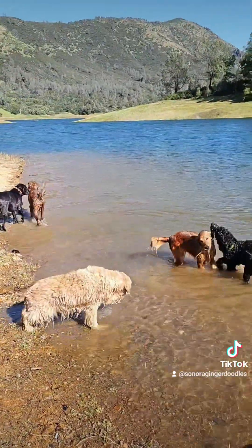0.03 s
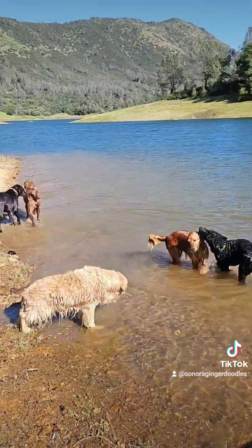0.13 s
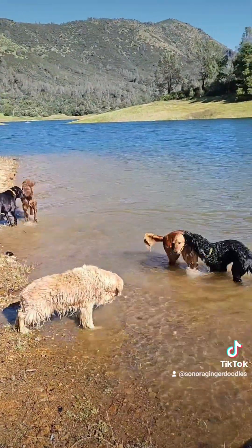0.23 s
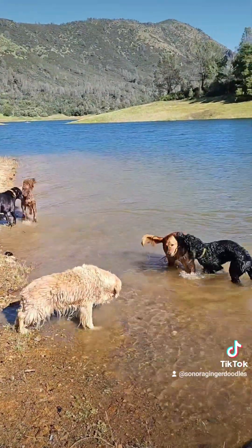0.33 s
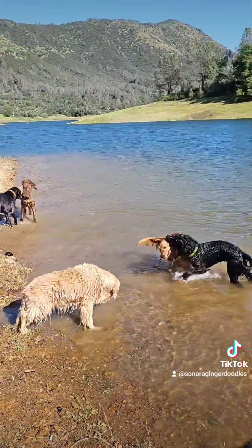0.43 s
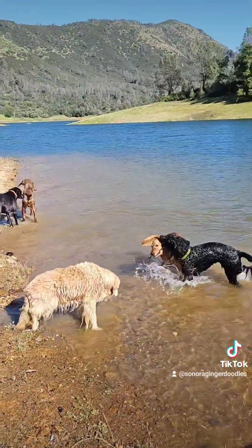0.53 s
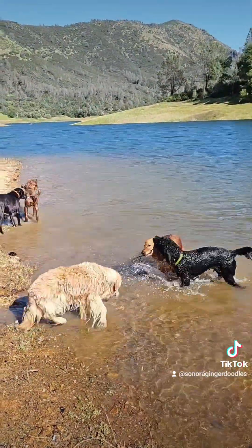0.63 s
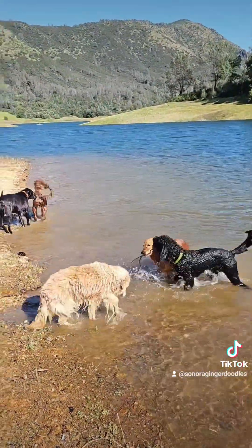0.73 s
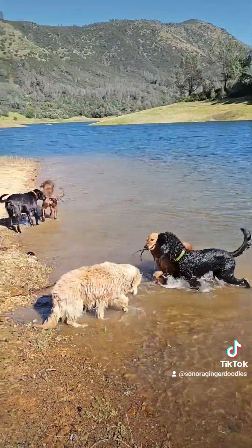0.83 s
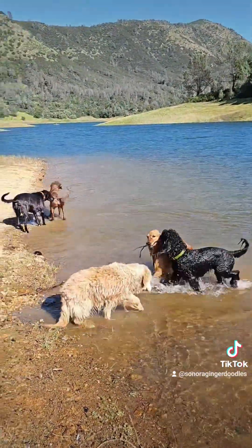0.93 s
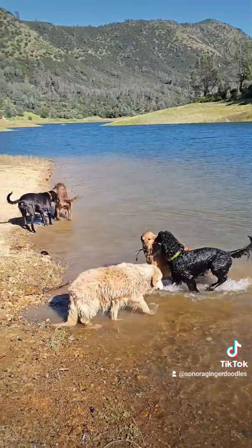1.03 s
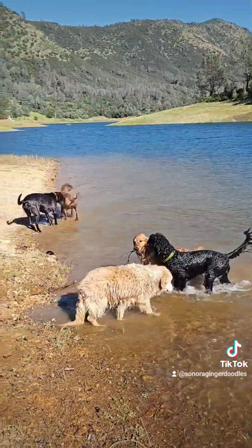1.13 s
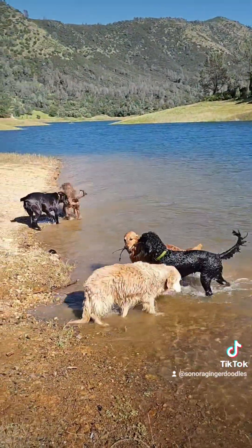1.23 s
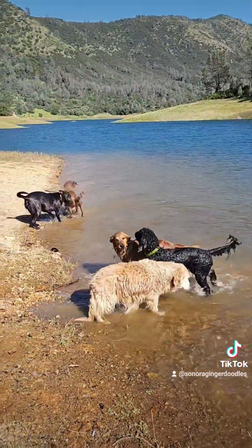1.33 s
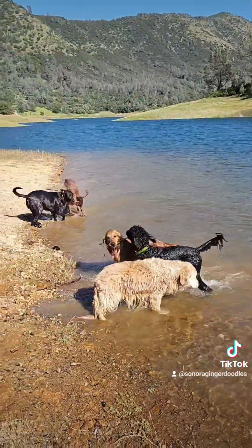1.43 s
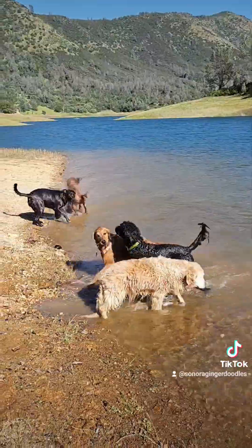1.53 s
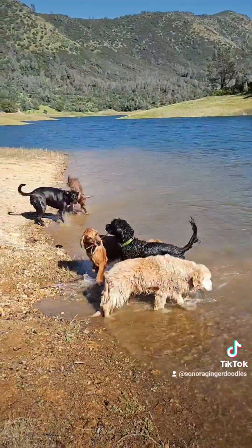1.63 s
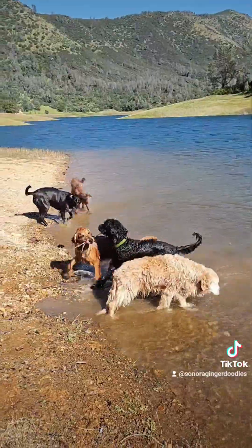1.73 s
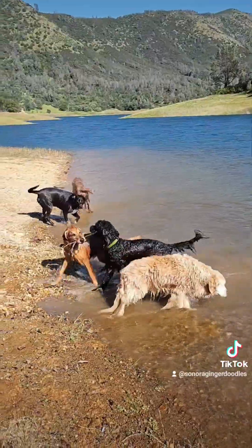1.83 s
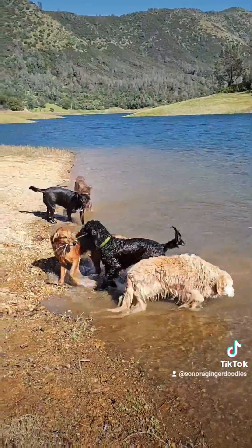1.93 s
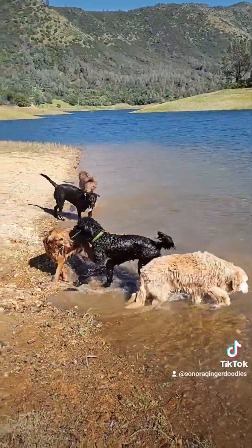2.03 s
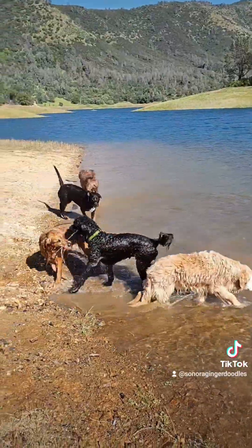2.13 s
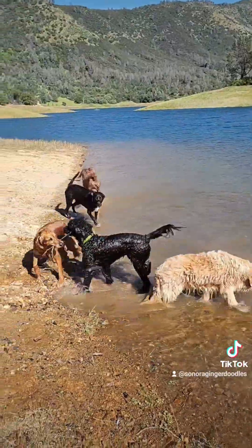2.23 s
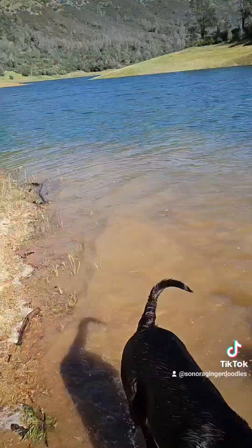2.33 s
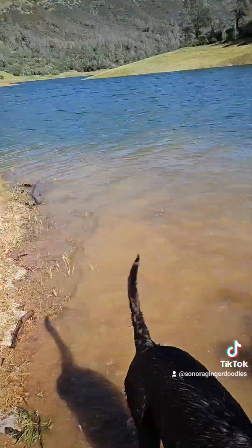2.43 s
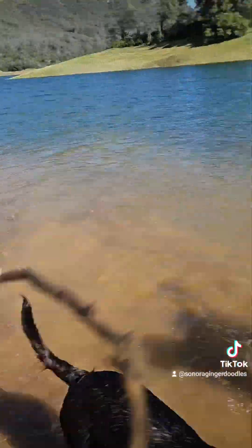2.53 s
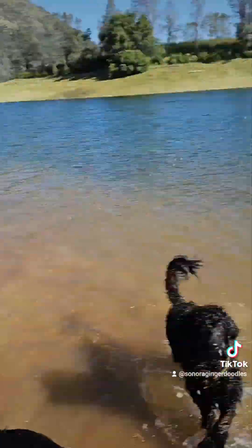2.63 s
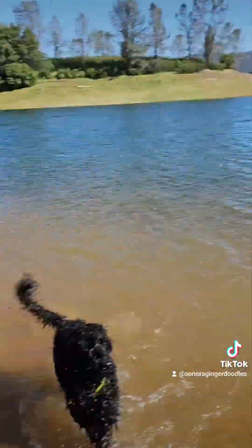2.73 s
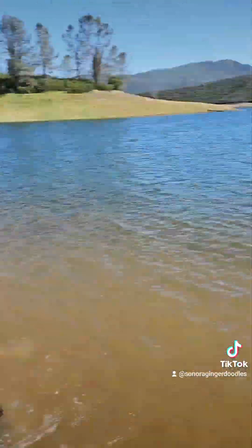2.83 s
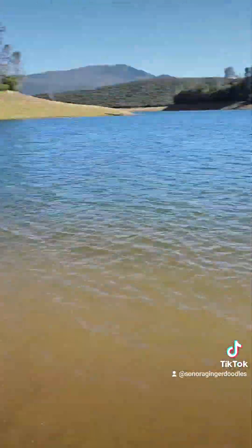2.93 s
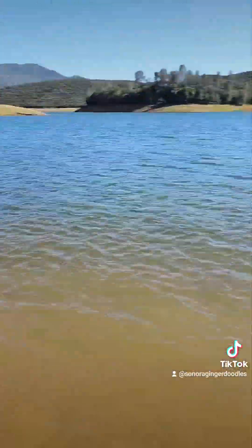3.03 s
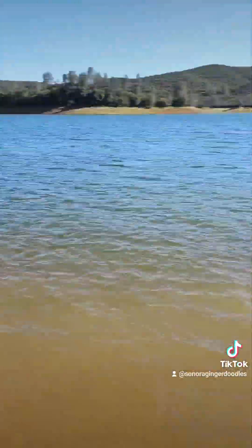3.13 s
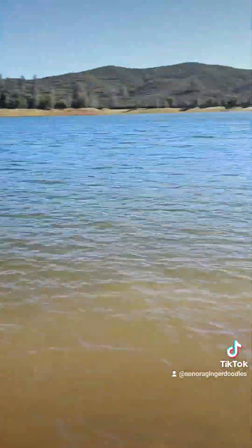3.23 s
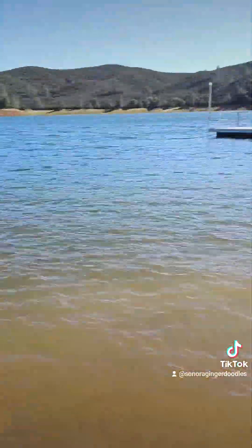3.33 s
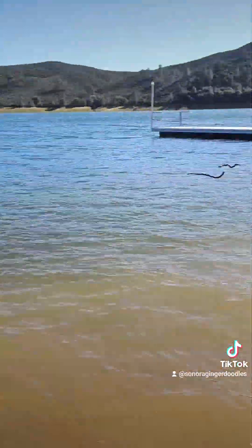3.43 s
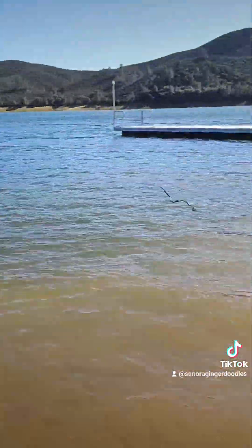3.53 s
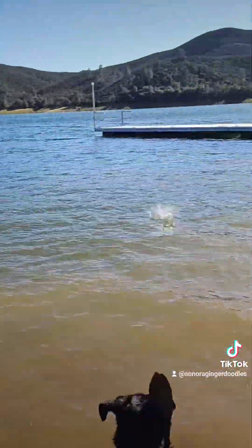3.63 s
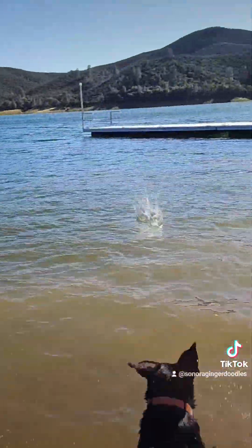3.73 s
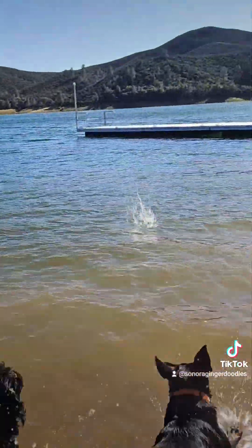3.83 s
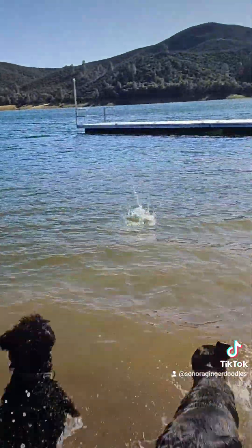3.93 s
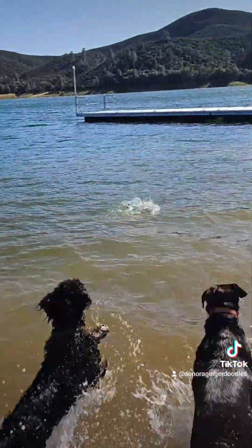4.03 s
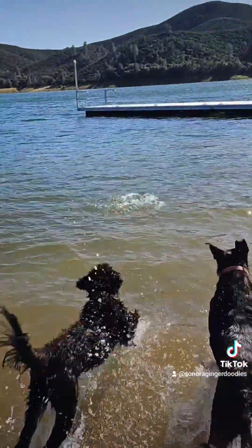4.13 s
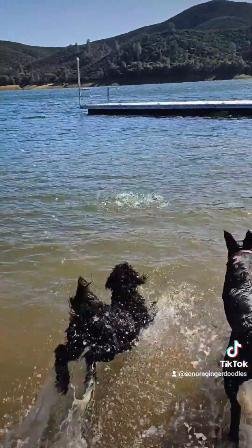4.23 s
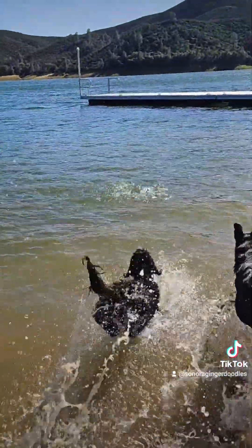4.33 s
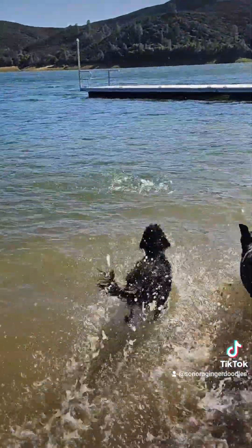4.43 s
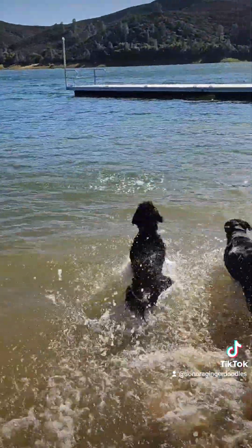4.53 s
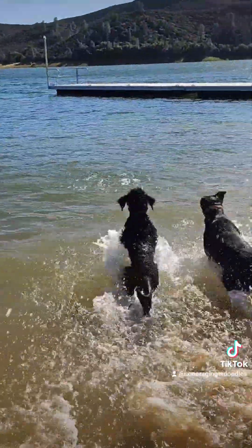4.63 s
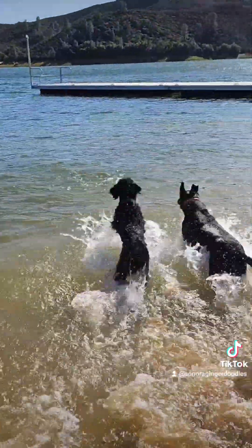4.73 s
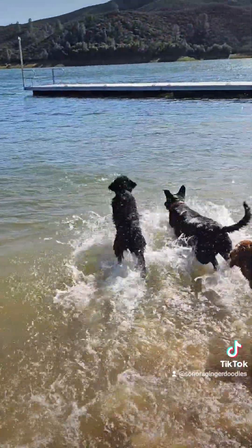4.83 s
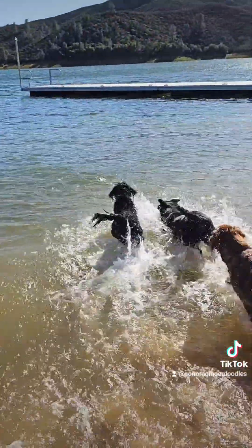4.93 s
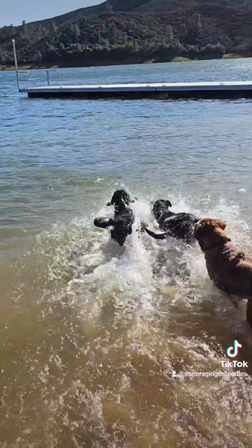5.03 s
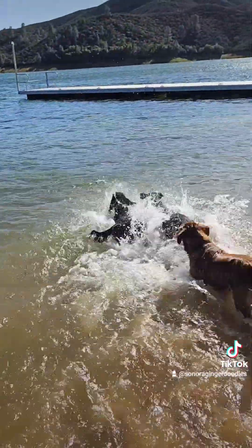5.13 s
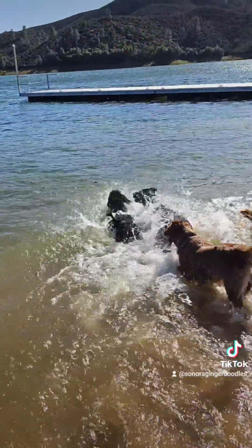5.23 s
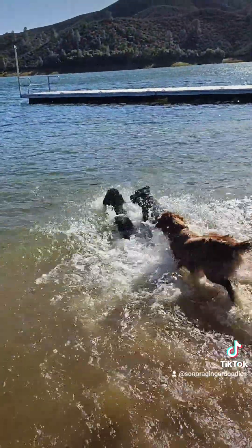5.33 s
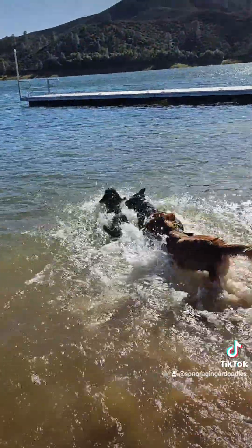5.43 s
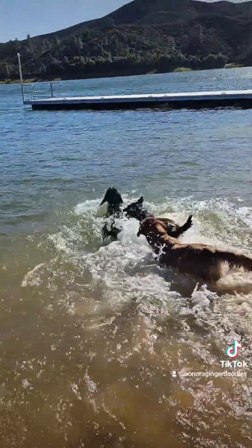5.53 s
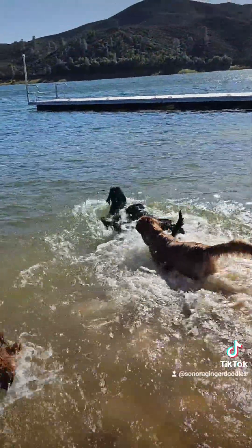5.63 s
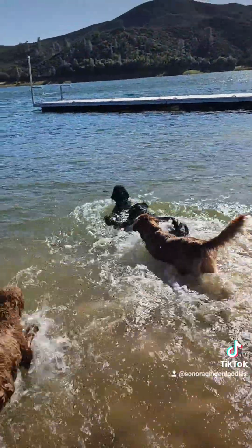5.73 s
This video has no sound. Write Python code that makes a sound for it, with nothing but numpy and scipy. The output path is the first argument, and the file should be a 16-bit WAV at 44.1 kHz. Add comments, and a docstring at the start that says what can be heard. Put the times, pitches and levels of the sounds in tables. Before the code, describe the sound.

Dogs wade quietly through lake shallows in buffeting wind, then after a brief silence several charge into the water close by with heavy splashing.

```python
"""Lake shallows, microphone in the wind: dogs wade at a distance in one direction; after a short silent
break several charge into the water close by, on all sides.
The water is a swarm of ringing bubbles and falling drops, with paw slaps and the gulps of collapsing hollows.
Wind is lumpy low noise, unrelated at the microphone's two ports, with single eddies as short pressure pulses."""
import sys
import numpy as np
from scipy import signal
from scipy.fft import rfft, irfft, next_fast_len
from scipy.io import wavfile
from scipy.ndimage import uniform_filter1d, map_coordinates

SR = 44100
rng = np.random.default_rng(int(sys.argv[2]) if len(sys.argv) > 2 else 0)


def waveform_to_disk(signal):
    """Save audio, clipped to [-1, 1], as 16-bit WAV at the path in sys.argv[1]."""
    frames = np.transpose(np.atleast_2d(signal))
    scaled = np.clip(frames, -1, 1) * 32767
    samples = np.round(scaled).astype(np.int16)
    wavfile.write(sys.argv[1], SR, samples)


N = 254456
TIME = np.arange(N) / SR

# Levels in the tables are before the trims given in the calls; positive left_right_db leans left.

# water kept churning by all the legs; deep water gurgles, shallow water sprays: start_s, level_db, depth_db
CHURN = [(0.0, -63.5, -1.3), (0.188, -61, 2.2), (0.434, -56.5, 1), (1.106, -59, 0.6), (1.635, -58.5, -2),
         (2.098, -59, 2), (2.34, -60.5, -2), (2.74, -71.5, -9), (2.834, -59, 0.5), (3.144, -57, -3),
         (3.393, -49, -3.5), (3.774, -45.5, -2.8), (4.525, -46, -1.5), (4.818, -49, 0), (5.294, -47, -0.4),
         (5.77, -46.5, -0.7)]
# a leg or chest ploughs through the water: start_s, push_s, level_db, depth_db
STRIDES = [(0.121, 0.025, -59.5, 6.1), (0.302, 0.015, -76, 19), (0.444, 0.17, -65.5, -11.5),
           (0.78, 0.096, -58.5, 4), (0.899, 0.065, -65, -7), (0.988, 0.074, -57, 0.5),
           (1.172, 0.057, -60, 0.5), (1.279, 0.028, -55.5, 1), (1.357, 0.056, -60.5, -1.5),
           (1.7, 0.037, -58.5, 2.5), (1.764, 0.078, -58.5, 1), (1.94, 0.113, -73.5, -18.5),
           (2.088, 0.084, -59.5, 0), (2.183, 0.05, -55, 2.3), (2.895, 0.023, -56.5, 8),
           (3.056, 0.027, -53.5, -5.5), (3.243, 0.051, -59.5, 5), (3.449, 0.026, -60, -5),
           (3.57, 0.079, -48.5, 0.5), (3.697, 0.031, -48.5, -0.5), (3.855, 0.038, -46.5, -3.5),
           (3.986, 0.018, -49, 5.5), (4.078, 0.028, -47, 7.5), (4.207, 0.038, -50.5, 7),
           (4.303, 0.023, -48.5, -1), (4.482, 0.091, -44, -0.7), (4.583, 0.2, -45, 1.5),
           (4.83, 0.015, -57.5, -15), (4.961, 0.1, -43.5, -1.3), (5.112, 0.08, -46, 0.7),
           (5.404, 0.075, -47, -2.5), (5.614, 0.07, -47.5, 4.5)]
# colour of the distant water: pitch_hz, relative level_db
FAR_WATER = [(150, -7), (400, 10), (600, 6), (800, 8), (980, 7.5), (1220, -6.5), (1600, -2), (1950, -3.5),
             (2400, -14), (4500, -19.5), (5800, -26), (9000, -26), (12500, -31.5), (15700, -27)]
# sound bends round the microphone body, from afar: pitch_hz, left_lead_radians
FAR_PHASE = [(600, 0), (950, -.65), (1250, -1.2), (1550, 0), (2100, 1.5), (3000, 4.6), (3900, 5.2),
             (4700, 6.3), (5700, 9.4), (7500, 12), (10000, 12.6), (15000, 14)]
# the wind between gusts: start_s, level_db, flutter_db (over the rumble), left_right_db
BREEZE = [(0.0, -45, -2.5, -5.5), (0.65, -47.5, 0.5, 10.5), (0.92, -69, 3.5, 13), (1.154, -72, 10, 10),
          (1.208, -53.5, 0, 19), (1.576, -50, -8, 3), (1.763, -67.5, 5.5, 7), (2.34, -66, 5, -12.5),
          (2.74, -53.5, 4.5, 17.5), (2.972, -49.5, -7, -32), (3.523, -51, -1.5, -24), (3.754, -44, 4.5, -1),
          (4.215, -40.5, -0.5, 1), (4.322, -45.5, -3, 0), (4.75, -45.5, 3.5, 1.5), (5.034, -49, 4.5, -1.5),
          (5.342, -39.5, -1, -2.5), (5.77, -40.5, -2.5, -1)]
# each gust swells and fades as a bell: peak_s, length_s, level_db, flutter_db (over the rumble), left_right_db
GUSTS = [(0.163, 0.015, -46, 7.5, 0), (0.312, 0.032, -41.5, 6, 0), (0.381, 0.031, -38, 4.5, 0.5),
         (0.476, 0.08, -43.5, 5.5, 4), (0.551, 0.043, -41.5, 6, -0.5), (0.797, 0.037, -46, 0, 4.5),
         (0.97, 0.036, -56.5, 4, 20), (1.06, 0.028, -55.5, -7, 20), (1.466, 0.07, -41.5, 6, 4.5),
         (1.89, 0.078, -50.5, -1, 0), (2.09, 0.072, -54.5, -1, -3), (2.318, 0.02, -60, -2, -6),
         (2.783, 0.04, -43.5, -6, 24), (2.979, 0.047, -38.5, 0, -3), (3.048, 0.051, -42, -2.5, -15),
         (3.303, 0.095, -39.5, 5, -0.5), (3.393, 0.13, -40.5, -1, 4), (3.718, 0.13, -39, 4.5, 1.5),
         (4.005, 0.04, -38, -2, -3), (4.123, 0.052, -53.5, 11, 4), (4.52, 0.067, -46, 4, -3),
         (4.623, 0.028, -40, 6.5, -1), (5.235, 0.029, -45, 11.5, 2), (5.717, 0.018, -39, -5, -7)]
# colour of the large eddies: pitch_hz, relative level_db
RUMBLE = [(12, -24), (25, -14), (45, -2), (65, -0.5), (100, -5), (150, -7), (220, -23), (400, -30),
          (1000, -79)]
# colour of the small fast eddies: pitch_hz, relative level_db
FLUTTER = [(60, -38.5), (120, -10.5), (180, 1), (300, -1.5), (420, -10), (600, -20.5), (1000, -29.5),
           (2500, -40), (8000, -84.5)]
# hollows behind plunging legs collapse: start_s, level_db, pitch_hz, ring_cycles
GULPS = [(0.14, -48, 610, 1.2), (0.31, -35.5, 524, 1.1), (0.548, -38.5, 436, 2.3), (0.787, -42.5, 517, 1.5),
         (2.817, -37, 410, 0.53), (2.906, -43.5, 565, 4.1), (2.96, -33, 490, 1.3), (3.258, -23, 360, 0.86),
         (3.279, -31, 445, 4.2), (3.705, -26.5, 600, 1.8), (3.987, -26, 350, 3.2), (4.003, -28, 486, 1.4),
         (4.104, -21, 267, 1.5), (4.221, -25.5, 400, 2.3), (4.243, -17, 772, 3.6), (4.246, -24, 325, 1.14),
         (4.487, -27.5, 344, 1.5), (4.55, -20.5, 415, 1.7), (4.607, -22.5, 454, 0.37),
         (4.731, -29, 253, 4.3), (5.059, -28, 324, 2.1), (5.216, -37, 285, 2.4), (5.658, -20, 450, 1.4)]
# the strongest single eddies at the ports: start_s, level_db, pitch_hz, left_right_db
EDDIES = [(0.156, -28.5, 113, 2), (0.385, -28, 72.7, -3), (0.551, -21, 137, 6), (0.786, -30.5, 255, 1),
          (1.437, -32, 91, 27), (1.954, -34, 172, -12), (2.96, -22.5, 205, -6), (3.315, -17, 138, -2),
          (3.646, -16.5, 234, -1), (3.687, -21.5, 148, 7), (3.922, -29, 90, 0), (4.14, -28, 95, -1),
          (5.718, -26, 64, 1)]
# the loudest slaps of paws and thrown water: start_s, bubble level_db, bubble pitch_hz, spray level_db
SLAPS = [(0.4062, -41, 1560, -50.5), (0.4653, -42, 1640, -64), (0.7936, -39, 1810, -66),
         (0.8148, -35, 1460, -72), (0.9117, -38, 1680, -54), (1.2933, -44, 1620, -68),
         (1.5613, -40, 1010, -68), (1.5854, -45, 1030, -61), (1.632, -40, 1650, -52),
         (1.9795, -54, 1610, -55), (2.136, -41, 950, -68), (2.1512, -48, 1800, -52),
         (2.206, -35.5, 1560, -70), (2.2473, -43, 1920, -50), (2.912, -48, 1000, -48),
         (3.005, -50, 1420, -50.5), (3.0713, -33.5, 1310, -49), (3.2144, -33, 1240, -53),
         (3.362, -34, 1400, -58), (3.4737, -39, 2140, -43), (3.562, -40, 2400, -46),
         (3.592, -24, 2410, -42.5), (3.6101, -29, 1620, -45), (3.6361, -43, 2500, -39),
         (3.712, -35, 1330, -62), (3.8717, -31.5, 1060, -39), (3.903, -28.5, 1030, -44),
         (3.9478, -35, 3460, -47), (4.1096, -27.5, 1040, -50), (4.2472, -28, 1020, -43),
         (4.3124, -29, 1810, -59), (4.3887, -35, 1780, -44), (4.4992, -43.5, 2320, -44),
         (4.5605, -30, 1630, -58), (4.6189, -29.5, 2130, -50), (4.6902, -31, 2130, -65),
         (4.7376, -28, 1530, -69), (4.8485, -33.5, 1920, -48), (4.9811, -29, 1720, -44),
         (4.999, -25, 1660, -49), (5.146, -27, 2280, -44), (5.177, -34, 2630, -57),
         (5.4241, -34, 2770, -41), (5.445, -34, 2460, -44), (5.6318, -32, 1060, -49),
         (5.684, -33.5, 1850, -54)]
# the silent break: start_s, end_s
BREAK_S = (2.349, 2.733)
# the charging dogs' path: start_s, left_delay_ms (of their drops), pitch_hz (where small bubbles are strongest)
COURSE = [(2.74, 0.17, 2500), (3.1, 0.49, 2500), (3.5, 0.37, 2400), (3.9, 0.29, 2780), (4.3, 0.13, 2020),
          (4.7, 0.016, 1770), (5.2, 0.088, 1580), (5.45, 0.29, 2380), (5.77, 0.21, 1650)]
# colour of the water close by, also of slap spray: pitch_hz, relative level_db
NEAR_WATER = [(120, -21), (350, 10), (600, 2.5), (780, 2.5), (1220, -1.5), (1480, 4.5), (1900, -2.5),
              (2550, -4), (3400, -11), (6600, -18.5), (8400, -17), (10000, -19), (11700, -22.5),
              (13800, -22.5), (15300, -17)]
# sound bends round the microphone body, from close by: pitch_hz, left_lead_radians
NEAR_PHASE = [(300, -.4), (780, -.45), (1000, -1), (1250, -2.4), (1600, -4.9), (2300, -6.3), (3000, -6.9),
              (4000, -6.3)]

# a stride's splash rises, holds while the dog pushes, then settles: each voice of the water at its own speed
RISE_S = 0.014
GURGLE_SETTLE_S, SPLASH_SETTLE_S, SPRAY_SETTLE_S = 0.028, 0.033, 0.025
SPRAY_LOSS = 0.96  # dB of spray lost for each dB of depth
GULP_PAN_DB, SLAP_PAN_DB = -2.5, -5
# small slaps fall in between: their bubbles and spray in dB over the surrounding water, and the spread either way
SMALL_SLAP_COUNT = 60
SMALL_RING_DB, SMALL_SPRAY_DB, SMALL_SPREAD_DB = 0, -7.5, 8.5
# a louder slap lasts longer: decay at a middling level, and the dB it grows by per dB
SLAP_DECAY_S, MIDDLING_DB, SLAP_GROWTH = 0.0085, -38, 0.15
EDGE_HZ = 15830  # upper band limit


def gain_of(db):
    """Decibels to amplitude."""
    return 10 ** (np.asarray(db) / 20)


def evened(x):
    """Scales to rms 1."""
    return x / np.sqrt(np.mean(x ** 2) + 1e-20)


def steadied(x, size):
    """Holds the running rms over about size samples at 1; faster flicker stays."""
    power = (x ** 2).mean(0)
    smooth = uniform_filter1d(uniform_filter1d(power, size), size)
    return x / np.sqrt(abs(smooth) + 1e-20)


def read(points, hz):
    """Reads a spectrum on a log-frequency axis."""
    f, value = np.transpose(points)
    return np.interp(np.log(hz + 1), np.log(f + 1), value)


def curves(rows):
    """One sample-rate curve for each column after the time."""
    s, *columns = np.transpose(rows)
    return [np.interp(TIME, s, c) for c in columns]


def sides(pan_db):
    """Left and right gains for a level difference, at constant power."""
    pair = gain_of(np.array([[.5], [-.5]]) * pan_db)
    return pair / np.sqrt((pair ** 2).mean(0))


def filtered(x, response):
    """Applies a response given as a function of frequency."""
    size = next_fast_len(x.shape[-1] + 2048, True)
    spectrum = rfft(x, size) * response(np.fft.rfftfreq(size, 1 / SR))
    return irfft(spectrum, size)[..., :x.shape[-1]]


def tinted(x, spectrum):
    """Colours a sound by a table of pitch_hz and level_db."""
    return filtered(x, lambda hz: gain_of(read(spectrum, hz)))


def add(mix, s, sound):
    """Mixes a sound in at time s, in place."""
    part = mix[:, max(round(s * SR), 0):][:, :sound.shape[1]]
    part += sound[:, :part.shape[1]]


def ports(x, phase):
    """The right port hears the water with a phase shift that depends on frequency."""
    right = filtered(x[1], lambda hz: np.exp(-1j * read(phase, hz)))
    return np.array([x[0], right])


def stirred(depth_share, settle_s):
    """Loudness of one voice of the water: the powers of churn and strides add, weighted by depth."""
    level, depth = curves(CHURN)
    power = gain_of(level + depth_share * depth)[None] ** 2
    t = np.arange(SR // 2) / SR
    for s, push, db, depth in STRIDES:
        shape = np.minimum(t / RISE_S, 1) * np.exp(-np.maximum(t - push, 0) / settle_s)
        add(power, s, (gain_of(db + depth_share * depth) * shape[None]) ** 2)
    return np.sqrt(power)


def falls(per_s, decay_s, spread_db):
    """Random landings of uneven size, each a quick rise of power that dies away; mean 1."""
    landed = rng.random(N) < per_s / SR
    sizes = gain_of(spread_db * np.minimum(rng.exponential(1, N), 4.5)) * landed
    power = signal.lfilter([1], [1, -np.exp(-1 / (decay_s * SR))], sizes ** 2)
    return abs(uniform_filter1d(power, size=45)) / power.mean()


def bubbles(low_hz, high_hz, common_hz, cycles, spread_db, scatter_ms, count):
    """A swarm of bubbles, strongest round one pitch: most die at once, a few ring on, rising in pitch."""
    when, pitch, size, life, place = rng.random((count, 5)).T
    start = (when * (N - 1)).astype(int)
    hz = low_hz * (high_hz / low_hz) ** pitch
    strongest_hz = (common_hz * np.ones(N))[start]
    emphasis = 1 + 0.52 * np.exp(-(np.log(hz / strongest_hz) / 0.27) ** 2)
    height = hz * emphasis * gain_of(spread_db * np.minimum(-np.log(1 - size), 3.3))
    decay = cycles * np.minimum((1 - life) ** -.6, 4.5) / hz
    # each bubble has its own direction, so its own delay between the ports
    lag = scatter_ms * np.log(place / (1 - place)) / 1000
    # all the rings lie end to end: which bubble each sample belongs to, and its step within the ring
    length = (4 * decay * SR).astype(int) + 40
    who = np.repeat(np.arange(count), length)
    step = np.arange(len(who)) - (np.cumsum(length) - length)[who]
    out = []
    for side in (.5, -.5):
        t = np.maximum((step - 20) / SR - side * lag[who], 0)
        age, turns = np.float32(t / decay[who]), np.float32(hz[who] * t)
        envelope = height[who] * np.minimum(turns, 1) * np.exp(-age)
        ring = envelope * np.sin(2 * np.pi * turns * (1 + 0.017 * age))
        out.append(np.bincount(start[who] + step, ring, N)[:N])
    return evened(np.array(out))


def drops(lag_ms, alike, spread_db):
    """Thousands of drops a second, each a tiny burst of fizz; part of it reaches both ports with a delay."""
    patter = np.sqrt(falls(per_s=3100, decay_s=0.0054, spread_db=spread_db))
    shared, own = rng.standard_normal((2, N)) * patter
    left = map_coordinates(shared, [np.arange(N) - lag_ms * SR / 1000], mode="nearest")
    right = alike * shared + np.sqrt(1 - alike ** 2) * own
    return filtered(np.array([left, right]), lambda hz: hz ** 4 / (hz ** 4 + 3200 ** 4))


def water(colour, lag_ms, common_hz, scatter_ms, alike, gurgle_db, splash_db, spray_db,
          bubble_db, drop_db, tinkle, clump):
    """Large bubbles gurgle, small ones splash, drops fizz and tinkle; the same lumps of falling water drive all."""
    lumps = np.sqrt(1.5 + clump * falls(per_s=110, decay_s=0.014, spread_db=6))
    large = bubbles(295.4, 1232.5, 730, cycles=1.89, spread_db=bubble_db, scatter_ms=2 * scatter_ms, count=4200)
    small = bubbles(1076, 3542, common_hz, cycles=2.94, spread_db=bubble_db, scatter_ms=scatter_ms, count=11000)
    tiny = bubbles(3000, 12000, 9300, cycles=5.5, spread_db=6.5, scatter_ms=scatter_ms, count=4000)
    fizz = drops(lag_ms, alike, drop_db) + tinkle * tiny
    voices = [(large, gurgle_db, stirred(1, GURGLE_SETTLE_S)),
              (small, splash_db, stirred(0, SPLASH_SETTLE_S)),
              (fizz, spray_db, stirred(-SPRAY_LOSS, SPRAY_SETTLE_S))]
    out = np.zeros((2, N))
    for swarm, db, force in voices:
        out += gain_of(db) * force * steadied(tinted(lumps * swarm, colour), size=2600)
    return out


def turbulence(spectrum, lump_db, lump_hz):
    """Lumpy pressure noise, unrelated at the two ports."""
    noise, lumps = rng.standard_normal((2, 2, N))
    lumps = evened(filtered(lumps, lambda hz: 1 / (1 + (hz / lump_hz) ** 4)))
    return steadied(tinted(noise * gain_of(lump_db * lumps), spectrum), size=2600)


def wind(rumble_db, flutter_db):
    """Large eddies rumble; small fast ones flutter above them. Gusts add their power to the breeze."""
    level, flutter, pan = curves(BREEZE)
    slow_power = (gain_of(level) * sides(pan)) ** 2
    fast_power = slow_power * gain_of(flutter) ** 2
    for s, length, db, flutter, pan in GUSTS:
        bell = np.exp(-(2 * (TIME - s) / length) ** 2)
        gust = (gain_of(db) * sides(pan)) ** 2 * bell
        slow_power = slow_power + gust
        fast_power = fast_power + gust * gain_of(flutter) ** 2
    large = gain_of(rumble_db) * turbulence(RUMBLE, lump_db=4.5, lump_hz=25)
    small = gain_of(flutter_db) * turbulence(FLUTTER, lump_db=6.0, lump_hz=60)
    return np.sqrt(slow_power) * large + np.sqrt(fast_power) * small


def wading(paws):
    """Dogs step about at a distance, their drops with no delay between the ports, in the wind."""
    lake = water(FAR_WATER, lag_ms=0, common_hz=1640, scatter_ms=0.056, alike=0.4,
                 gurgle_db=-0.16, splash_db=-0.1, spray_db=-3.0,
                 bubble_db=3.5, drop_db=2.0, tinkle=0.34, clump=1.0)
    return ports(lake + paws, FAR_PHASE) + wind(rumble_db=2.05, flutter_db=-5.5)


def gulps(level_db, closing_s):
    """A hollow in the water swells into a ring as it closes, then dies within a few cycles."""
    out, t = np.zeros((2, N)), np.arange(2600) / SR
    for s, db, hz, cycles in GULPS:
        turns = (t - closing_s) * hz
        envelope = np.minimum(t / closing_s, 1) / np.cosh(2 * turns / max(cycles, .6))
        ring = np.cos(2 * np.pi * turns) * envelope
        add(out, s, gain_of(db + level_db) * sides(GULP_PAN_DB) * ring)
    return out


def eddies(level_db, centre_s):
    """A passing eddy sucks and then pushes, reaching one port a little after the other."""
    out, t = np.zeros((2, N)), np.arange(2200) / SR
    for s, db, hz, pan in EDDIES:
        port_delay = rng.normal(0, 0.0017, (2, 1))
        turns = (t - centre_s - port_delay) * hz
        pulse = np.sin(2 * np.pi * turns) * np.exp(-(turns / 0.71) ** 2)
        add(out, s, gain_of(db + level_db) * sides(pan) * pulse)
    return out


def small_slaps():
    """Rows like those of SLAPS at random moments, their strength following the splash and spray around them."""
    when, size, pitch = rng.random((SMALL_SLAP_COUNT, 3)).T
    at = (when * (N - 1)).astype(int)
    spread = SMALL_SPREAD_DB * (2 * size - 1)
    splash = 20 * np.log10(stirred(0, SPLASH_SETTLE_S)[0, at]) + spread
    spray = 20 * np.log10(stirred(-SPRAY_LOSS, SPLASH_SETTLE_S)[0, at]) + spread
    return list(zip(TIME[at], splash + SMALL_RING_DB, 1000 * 3 ** pitch, spray + SMALL_SPRAY_DB))


def slaps(ring_db, spray_db, width):
    """A slap bursts a cloud of like-sized bubbles (noise round one pitch) and throws fine spray to both sides."""
    out, t = np.zeros((2, N)), np.arange(3000) / SR
    for s, db, hz, fizz_db in SLAPS + small_slaps():
        noise = rng.standard_normal((3, len(t)))
        cloud = evened(filtered(noise[0], lambda f: 1 / (1 + ((f - hz) / (width * hz)) ** 2)))
        mist = evened(filtered(noise[1:],
                               lambda f: gain_of(read(NEAR_WATER, f)) * f ** 2 / (f ** 2 + 4000 ** 2)))
        decay_s = SLAP_DECAY_S * gain_of(SLAP_GROWTH * (db - MIDDLING_DB))
        burst = (1 - np.exp(-t / .0005)) * np.exp(-t / decay_s)
        slap = gain_of(db + ring_db) * cloud + gain_of(fizz_db + spray_db) * mist
        add(out, s, sides(SLAP_PAN_DB) * burst * slap)
    return out


def charging(paws):
    """Dogs bound in close by, in the wind; deeper water traps larger bubbles, which ring lower."""
    lag_ms, common_hz = curves(COURSE)
    lake = water(NEAR_WATER, lag_ms, common_hz, scatter_ms=0.059, alike=0.053,
                 gurgle_db=0.47, splash_db=-3.27, spray_db=-3.32,
                 bubble_db=2.0, drop_db=-0.9, tinkle=0.33, clump=0.13)
    return ports(lake + paws, NEAR_PHASE) + wind(rumble_db=2.04, flutter_db=-1.5)


def scene():
    """First the wading, then the charge, with single eddies over both."""
    paws = slaps(ring_db=-10.5, spray_db=5.0, width=0.15) + gulps(level_db=-3.5, closing_s=0.00817)
    dogs = np.where(TIME < np.mean(BREAK_S), wading(paws), charging(paws))
    return dogs + eddies(level_db=-3.5, centre_s=0.00734)


def record(dry):
    """Silence during the break, with 8 ms ramps; then the band limit."""
    outside_s = np.maximum(BREAK_S[0] - TIME, TIME - BREAK_S[1])
    gate = np.clip(outside_s / .008 + .5, 0, 1)
    lowpass = signal.firwin(511, EDGE_HZ, window=("kaiser", 9), fs=SR)
    return signal.oaconvolve(dry * gate, lowpass[None], "same")


dry = scene()
out = record(dry)
waveform_to_disk(out)
```